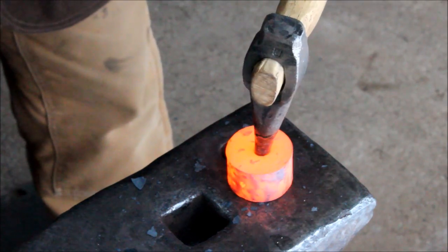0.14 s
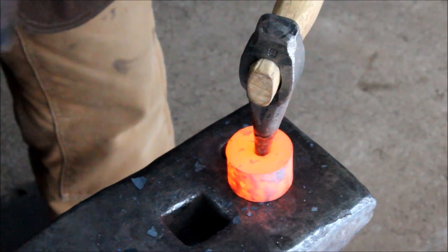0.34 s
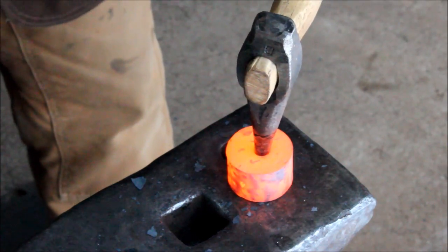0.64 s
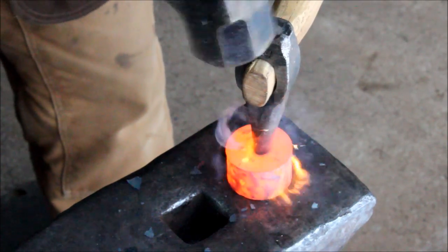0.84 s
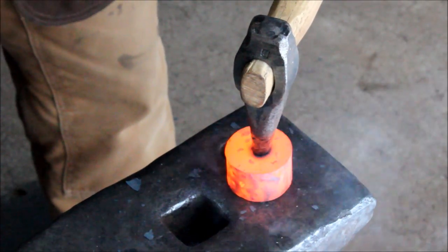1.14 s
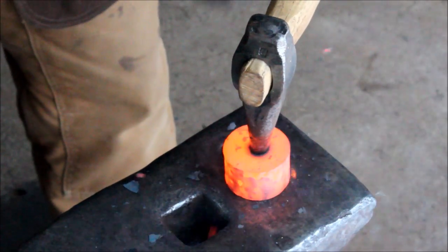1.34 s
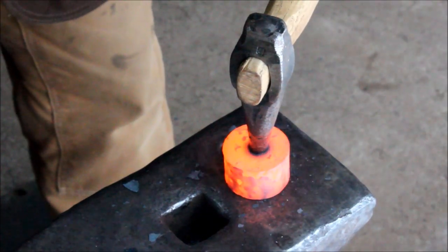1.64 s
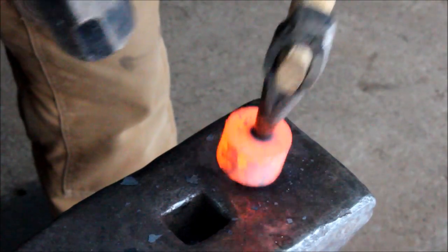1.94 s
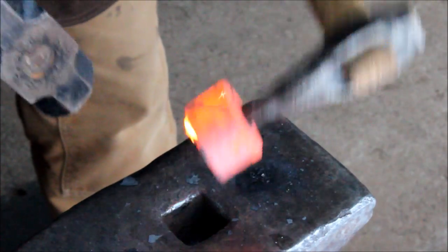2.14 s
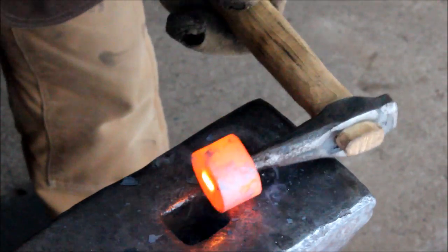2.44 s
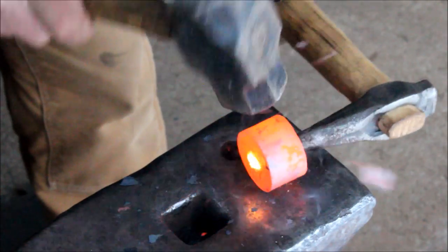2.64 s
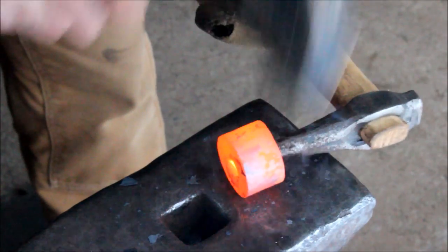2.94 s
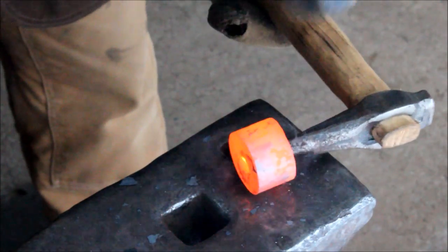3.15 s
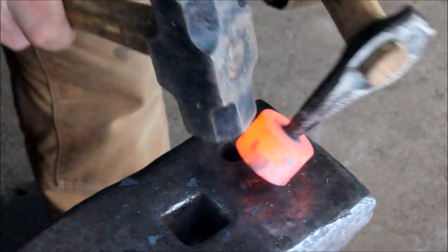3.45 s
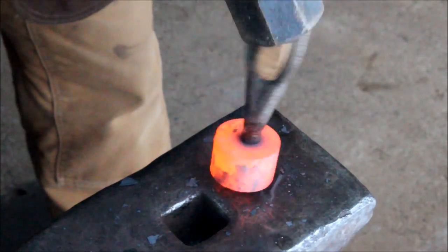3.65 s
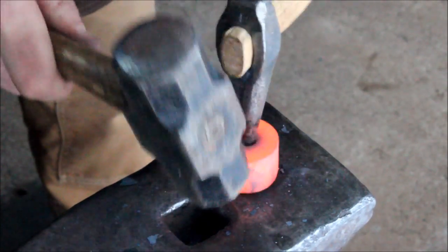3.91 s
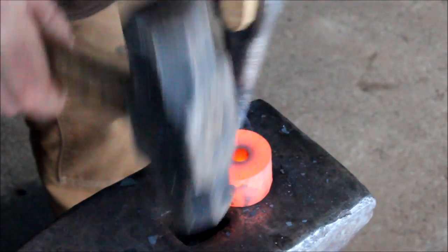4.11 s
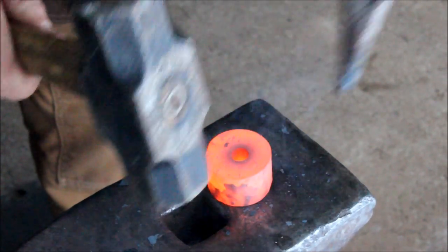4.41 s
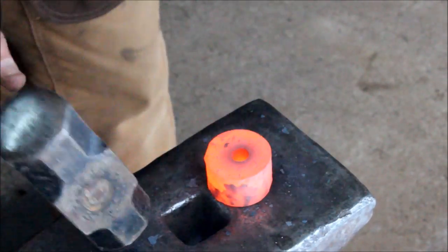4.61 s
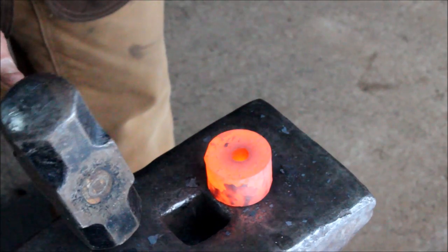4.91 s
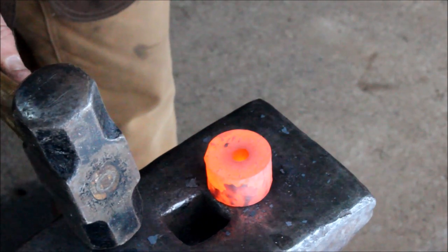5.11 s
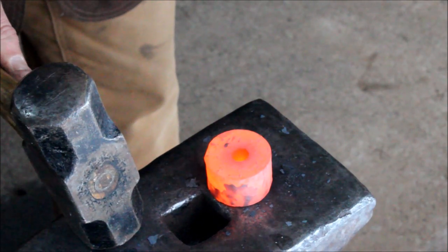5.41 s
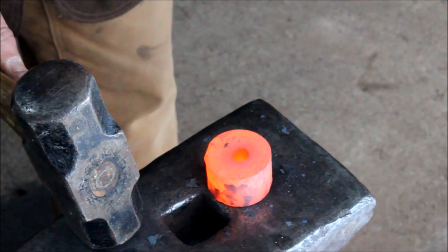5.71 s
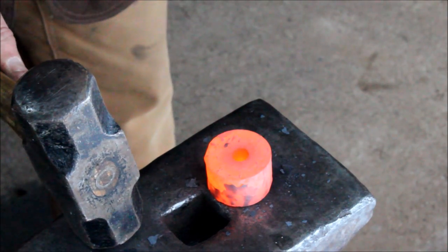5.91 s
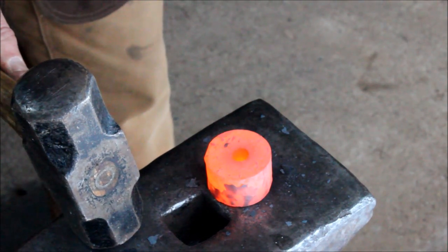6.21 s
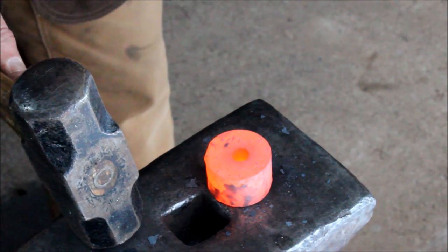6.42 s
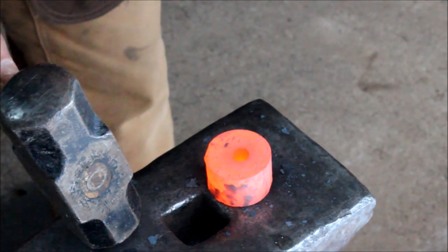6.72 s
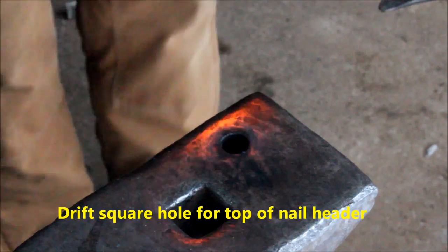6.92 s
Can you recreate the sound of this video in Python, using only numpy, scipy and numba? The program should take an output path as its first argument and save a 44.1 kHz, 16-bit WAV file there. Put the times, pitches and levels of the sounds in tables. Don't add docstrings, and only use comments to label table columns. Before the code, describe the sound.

Close recording of a sledge driving a punch on an anvil: loud clipped cracks with short bright metallic rings and a roomy tail. Lighter, uneven blows knock the piece loose, with dull clunks between. A last hit leads to tight bouncing as the hammer is laid down, followed by gritty dragging, a hollow knock and quiet forge hum with a faint whistle.

```python
import sys
import numpy as np
from scipy import signal
from scipy.fft import rfft, irfft
from scipy.io import wavfile
from scipy.ndimage import uniform_filter1d
from numba import njit

SR = 44100
rng = np.random.default_rng(int(sys.argv[2]) if len(sys.argv) > 2 else 0)


def elevation(decibels):
    levels = np.asarray(decibels, float)
    return 10 ** (levels / 20)


def inscribe(sig):
    pcm = np.round(np.clip(np.atleast_2d(sig).T, -1, 1) * 32767)
    wavfile.write(sys.argv[1], SR, pcm.astype(np.int16))


N = 311343


def colour(x, shape):
    hz, db = np.transpose(shape)
    f = np.fft.rfftfreq(len(x), 1 / SR) + 1
    gain = elevation(np.interp(np.log(f), np.log(hz), db))
    y = irfft(rfft(x) * gain, len(x))
    return y / np.std(y)


def band(x, lo_hz, hi_hz):
    return signal.sosfilt(signal.butter(2, [lo_hz, hi_hz], "band", fs=SR, output="sos"), x)


def fade(t, t60):
    return np.exp(-np.log(1000) * t / max(t60, .002))


def add(out, s, x):
    i = int(s * SR)
    out[i:i + len(x)] += x[:N - i]


def walk(rate_hz):
    hold = int(SR / rate_hz)
    steps = np.repeat(rng.standard_normal(N // hold + 1), hold)
    return 1.2 * uniform_filter1d(uniform_filter1d(steps, hold), hold)[:N]


# (time [s], crack [dB], force [dB], anvil waist ring [dB], tool ring [dB])
BLOWS = [
    [(0.8455, 13, 7, -36, -21)],
    [(1.287, 11, 5.5, -15, -26), (1.755, 9, 4.5, -17.5, -35)],
    [(2.276, -11.5, -9.5, -19, -45)],
    [(2.6535, 6, -1.5, -18, -46)],
    [(3.0317, 3, -2, -25.5, -43), (3.3675, -1, -5, -24, -51), (4.2119, 6, -5, -22, -39)],
    [(4.6626, -6, -8, -34, -46), (4.7805, -6, -8.5, -33, -46), (4.8353, -8, -11, -36, -47),
     (4.8689, -13, -22, -42, -56), (4.8844, -30, -15, -45, -56)],
]
# (thud over crack [dB], brightness [dB], crack t60 [s],
# echo bass [dB], echo low-mid [dB], echo treble [dB])
BLOW_CONTACT = [(-5, 1.5, .014, -8, -12, -1.5), (-20, -3, .014, -1.5, -12, 3),
                (-34, -40, .034, -9, -14, -6), (-12, -7, .016, 1, -1, 5), (-8, -11, .016, 2.5, -5, 0.5),
                (-4, -42, .016, -3, 8, -22)]
# (time [s], crack [dB], thud over crack [dB], brightness [dB], echo [dB])
KNOCKS = [(0.0851, -31, -26, -4, -42), (0.1886, -28.5, -26, -2, -33), (0.3512, -59, -12, -3, -41),
          (0.4314, -40, -7, 3.5, -45), (0.751, -36, -11, -27, -40), (3.8531, -30.5, 9.5, -28.5, -23.5),
          (3.8838, -13.5, 0.5, -22.5, -9), (4.1172, -47.5, 28, 1.5, -25), (4.1498, -12, -45, -27.5, -18),
          (5.126, -37.5, -38, 4.5, -49), (5.258, -32.5, -32, -6.5, -16), (5.3464, -27, -16.5, -14, -12.5),
          (5.7488, -23, -35.5, -5.5, -18), (5.9745, -33.5, -21, -5, -14.5), (6.0036, -24, -1.5, -5.5, -8),
          (6.0222, -6.5, -22, -21.5, 6), (6.1524, -43, -58, -18.5, -17.5), (6.2265, -26.5, -21, -6, -17),
          (6.8606, -33, -3, -16, -35.5), (6.898, -30, 15, -16, -29), (6.9565, -24.5, -0.5, -17, -12.5),
          (6.989, -31, -16, -2.5, -24.5), (7.0301, -21.5, -14.5, -21, -19.5)]


def contacts():
    events = []
    for kind, contact in zip(BLOWS, BLOW_CONTACT):
        for s, crack_db, force_db, _, _ in kind:
            events.append((s, crack_db, *contact[:3], force_db, *contact[3:]))
    for s, crack_db, thud_db, bright_db, echo_db in KNOCKS:
        treble_db = -11 if thud_db > 0 else 2
        events.append((s, crack_db, thud_db, bright_db, 0.014, echo_db, 1, 0.5, treble_db))
    return events


# (frequency [Hz], level [dB per Hz])
CRACK_SPECTRUM = [(24, -55), (40, 8.5), (1530, 0.5), (2080, -6), (2540, 8), (3360, -8.5), (3910, 4.5),
                  (5870, -5), (8580, -20.5), (14600, -26), (17000, -43)]
# (frequency [Hz], level [dB])
WALL_COLOUR = [(35, -55), (60, -13), (666, -7.5), (1280, -10), (2470, -11.5), (8510, -19.5), (14900, -40),
               (16000, -73)]


def cracks(events):
    direct, feed = np.zeros(N), np.zeros(N)
    t = np.arange(4096) / SR
    for s, db, thud_db, bright_db, t60, echo_db, bass_db, mid_db, treble_db in events:
        noise = colour(rng.standard_normal(len(t)), CRACK_SPECTRUM)
        middle = band(band(noise, 900, 6500), 400, 12000)
        middle *= fade(t * t / t60, t60) + 1.2 * fade(t, 0.0036)
        thud = band(band(noise, 130, 900) * fade(t, 2.5 * t60), 110, 1200)
        treble = band(noise, 6000, 17000) * fade(t * t / t60, .35 * t60)
        burst = middle + elevation(thud_db + 6) * thud + elevation(bright_db + 16) * treble
        add(direct, s, elevation(db - 9.5) * burst)
        tint = [(70, bass_db - 7), (200, bass_db), (350, bass_db), (1200, mid_db),
                (3200, 0), (8000, treble_db), (16000, 1.5 * treble_db)]
        impulse = np.arange(2048) == 256
        push = colour(colour(impulse, WALL_COLOUR), tint) / np.sqrt(2048)
        add(feed, s - 256 / SR, elevation(echo_db + 10.0) * push)
    return direct, feed


# (face [dB], horn [dB], heel [dB], shoulder [dB])
ANVIL_SHARE = [(-22, -31, -23, -46), (-21, -22, -20, -28), (-17, -14, -35, -50), (-46, -12, -31, -55),
               (-25, -17, -15.5, -36), (-39, -30, -27, -36)]
# (cheek [dB], eye [dB], punch shank [dB], punch head [dB])
TOOL_SHARE = [(2.5, -15, -25, -27), (-18, -17, -20, -24), (-12, -40, 1, -18), (-8, -7, -10, -32),
              (-1, -19, -8, -40), (11.5, -18, -28, -28)]


def ring_levels():
    rows = []
    for kind, (face, horn, heel, shoulder), tools in zip(BLOWS, ANVIL_SHARE, TOOL_SHARE):
        for s, _, force_db, waist_db, tool_db in kind:
            rows.append([s, force_db + face, force_db + horn, waist_db, force_db + heel, tool_db,
                         *(tool_db + np.array(tools)), force_db + shoulder])
    return np.array(rows)


# (frequency [Hz], ..)
PART_HZ = [
    [6105, 8245, 6713, 9885],
    [1809],
    [2455, 2490, 2444, 2530, 2735],
    [3903, 3915, 4975],
    [4570, 4657],
    [3597, 5880, 3391],
    [11160, 11148, 10240],
    [6874, 2401, 11530, 11990],
    [6480, 8689],
    [5560, 5110],
]
# (t60 [s], level [dB])
PART_RING = [
    [(.18, 0), (.32, -9), (.25, -21), (.15, -19)],
    [(.145, 1.5)],
    [(.085, 10), (.3, -9), (.45, -9), (.2, -11), (.2, -16)],
    [(.13, 0), (.35, -19), (.15, -14)],
    [(.9, 2), (.25, -8)],
    [(.5, 0), (.35, -15), (.3, -14)],
    [(.8, 4), (.65, -5), (.3, -7)],
    [(.2, 3), (.3, 16), (.35, -11), (.3, -9)],
    [(2.5, 0), (1.2, -3)],
    [(.28, 0), (.25, -4)],
]


def rings():
    out = np.zeros(N)
    levels = ring_levels()
    starts = levels[:, 0]
    for last, s, end, row in zip(np.append(0, starts), starts, np.append(starts[1:], N / SR), levels[:, 1:]):
        end = end if end - s > .2 else s + .4
        t = np.arange(int(SR * min(end - s + .002, .9))) / SR
        bounce_db = -1.7 * (s - last < .2)
        ring = 0
        for modes_hz, modes, part_db in zip(PART_HZ, PART_RING, row):
            for hz, (t60, db) in zip(modes_hz, modes):
                detune, turn = rng.random(2)
                pitch_hz = hz * (1 + .0008 * (detune - .5))
                lifted = t60 > .6 and s < 4
                t60 = t60 if s < 4 else min(t60, .5)
                decay = fade(t * t / t60 if t60 < .1 else t, t60)
                if lifted:
                    waver_db = 3.5 * np.sin(2 * np.pi * (4.0 * t + turn))
                    decay = decay * (1 - np.exp(-t / .035)) * elevation(waver_db)
                ring = ring + elevation(part_db + db + bounce_db) * decay * np.sin(2 * np.pi * pitch_hz * t)
        soft_ends = np.minimum(1, np.minimum(t, t[::-1]) / .0005)
        add(out, s, ring * soft_ends)
    return out


# (time [s], frequency [Hz], t60 [s], level [dB])
BODIES = [(0.926, 13100, .08, -52), (2.277, 2352, .045, -9), (2.277, 6874, .3, -32), (3.887, 253, .1, -25),
          (3.887, 340, .1, -29), (3.89, 6530, 1.5, -60), (3.91, 5250, .25, -46), (4.13, 7400, .3, -55),
          (4.149, 1324, .07, -29), (4.151, 2380, .1, -33), (4.212, 245, .05, -29), (4.212, 620, .04, -15),
          (4.212, 1550, .035, -7), (4.212, 1080, .03, -11), (4.664, 239, .15, -30), (4.782, 217, .3, -39),
          (4.837, 224, .15, -32), (4.782, 9130, .04, -48), (4.838, 9130, .05, -51), (5.258, 435, .3, -31),
          (5.258, 725, .12, -39), (5.55, 4600, .25, -37), (5.55, 5900, .15, -44), (6.027, 456, .16, -18),
          (6.023, 1000, .17, -17), (6.025, 1832, .056, -9.5), (6.901, 263, .08, -25),
          (6.987, 256, .03, -22)]


def bodies():
    out = np.zeros(N)
    t = np.arange(SR // 3) / SR
    for s, hz, t60, db in BODIES:
        unsteadiness_rad = .03 if hz < 2000 or 5 < s < 6 else .005
        wobble = np.cumsum(rng.standard_normal(len(t))) * unsteadiness_rad
        add(out, s, elevation(db) * fade(t, t60) * np.sin(2 * np.pi * hz * t + wobble))
    return out


def grit(rough_db):
    return rng.standard_normal(N) * elevation(rough_db * rng.exponential(size=N) + 2 * walk(40))


@njit
def svf(x, hz, width):
    y, b, l = np.empty(len(x)), 0., 0.
    for i in range(len(x)):
        g, k = np.tan(np.pi * hz[i] / SR), width / hz[i]
        v = (b + g * (x[i] - l)) / (1 + g * (g + k))
        b, l, y[i] = 2 * v - b, l + 2 * g * v, k * v
    return y


# (time [s], pressure [dB], weight [dB], body resonance [Hz])
DRAGS = [
    [(0.4, -75, -20, 1400), (0.48, -58.5, 3, 1722), (0.63, -49.5, -4.5, 1448), (0.72, -79, 5, 1400),
     (0.825, -45, -5, 1321)],
    [(2.0, -74, -3, 1842), (2.14, -60.5, -10.5, 1950), (2.26, -55, -5.5, 1900)],
    [(5.07, -56.5, -3, 1884), (5.14, -47, -8, 1750), (5.242, -46.5, 8.5, 1290), (5.258, -40.5, 19, 1280),
     (5.45, -45, 10.5, 1373), (5.53, -43.5, 5, 1165), (5.574, -33.5, -5.5, 1250), (5.744, -40, -8, 1400),
     (5.96, -50.5, -8.5, 1400)],
    [(6.1, -40.5, 24, 1480), (6.21, -54.5, -15, 1450), (6.23, -40.5, 8, 1680), (6.25, -48, -7, 1680),
     (6.322, -51.5, -7, 1673), (6.4, -77, -12, 1465)],
    [(6.85, -58, 2, 1100), (6.862, -42.5, -5, 1053), (6.886, -51, -1, 1080), (6.9, -36, 0, 1000),
     (6.978, -40, -1.5, 1780), (7.06, -40, -1.5, 1790)],
]
# (level over the pressure [dB], slope [dB per dB of weight])
DRAG_LAW = [(-8, .85), (1, .5), (-0.7, -.1), (-10.5, -1.15)]


def drags():
    t = np.arange(N) / SR
    rows = np.vstack(DRAGS)
    touching = sum((t >= d[0][0]) & (t <= d[-1][0]) for d in DRAGS)
    inside = uniform_filter1d(touching * 1., size=1600)
    press_db, weight_db, body_hz = (np.interp(t, rows[:, 0], c) for c in rows[:, 1:].T)
    levels_db = [press_db + db + slope * weight_db for db, slope in DRAG_LAW]
    grit_hz = 3050 * (1 + .07 * walk(6.5))
    coarse, fine = grit(1.5), grit(0.6)
    rumble = band(grit(0.61), 290, 790)
    body = svf(svf(coarse, body_hz, 320.), body_hz, 320.) + elevation(-5.5) * band(coarse, 800, 2700)
    edge = band(fine, 2100, 5600) + elevation(4) * svf(fine, grit_hz, 350.)
    hiss = band(band(grit(1.9), 5500, 11000), 3000, 13500)
    layers = zip((rumble, body, edge, hiss), levels_db)
    mix = sum(elevation(db) * x / np.std(x) for x, db in layers)
    top = signal.butter(8, 14500, fs=SR, output="sos")
    return inside * signal.sosfilt(top, mix)


# (frequency [Hz], t60 [s])
ROOM_T60 = [(100, 0.55), (400, 0.57), (1500, 0.55), (4000, 0.53), (8000, 0.29), (15000, 0.14)]


def forge(x):
    t = np.arange(SR) / SR
    edges_hz = 60 * 2 ** np.arange(0, 8.3, .5)
    hz, t60 = np.transpose(ROOM_T60)
    echo = np.zeros(len(t))
    for lo_hz, hi_hz in zip(edges_hz, edges_hz[1:]):
        band_t60 = np.interp(np.log(lo_hz), np.log(hz), t60)
        echo += band(rng.standard_normal(len(t)), lo_hz, hi_hz) * fade(t, band_t60)
    echo *= np.minimum(1, t / 0.00097) * (1 + elevation(13) * fade(t, 0.14))
    return signal.fftconvolve(x, echo / np.sqrt(np.sum(echo ** 2)))[:N]


def gain_db():
    t = np.arange(N) / SR
    rest_db, duck_db, recover_s = 3, 9.5, 0.9
    hard = [row[0] for kind in BLOWS[:-1] for row in kind]
    return rest_db - duck_db * sum((t > s) * np.exp(-np.abs(t - s) / recover_s) for s in hard)


# (frequency [Hz], level [dB per Hz])
HUM_SPECTRUM = [(12, -46.5), (20, -9), (222, -6), (285, -4.5), (1060, -15), (1860, -18.5), (2460, -17),
                (2750, -17.5), (3740, -22.5), (4060, -20.5), (9140, -28), (13900, -41.5), (16000, -43)]
# (time [s], length [s], level over the air [dB])
WHISTLES = [(-.1, 0.44, -10), (.45, 0.17, -9), (2.15, 1, -11), (4.4, 0.99, -14.5)]


def hum():
    t = np.arange(N) / SR
    air = colour(rng.standard_normal(N), HUM_SPECTRUM)
    low = band(air, 15, 1000)
    air = low * elevation(1.2 * walk(6)) + (air - low) * elevation(0.71 * walk(4.4))
    whistle = band(rng.standard_normal(N), 1780, 1950) * elevation(23.5 + 2.0 * walk(2.2))
    swell = elevation(-28.5)
    for s, length_s, db in WHISTLES:
        nearest_end_s = np.minimum(t - s, s + length_s - t)
        swell = swell + elevation(db) * np.clip(nearest_end_s / 0.12 + .5, 0, 1)
    return (air + whistle * swell) * elevation(-51.5 + gain_db())


def scene():
    direct, feed = cracks(contacts())
    direct = band(direct, 110, 20000)
    ring, drag = rings() + bodies(), drags()
    room = forge(feed + elevation(-11) * ring + elevation(-7.5) * drag)
    return (direct + ring + drag + room + hum())[None]


def band_limit(x):
    return signal.sosfilt(signal.butter(12, 17210, fs=SR, output="sos"), x)


def record(dry):
    mix = np.clip(dry, -1, 1)
    return band_limit(mix)


dry = scene()
out = record(dry)
inscribe(out)
```